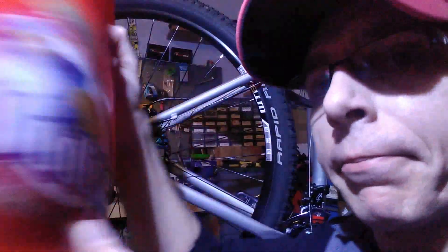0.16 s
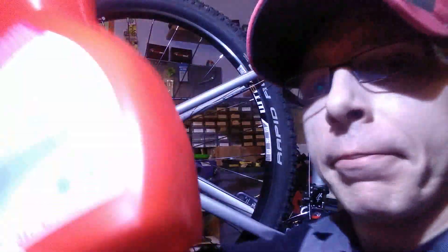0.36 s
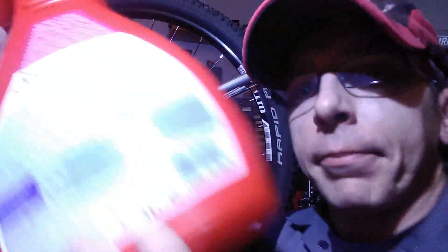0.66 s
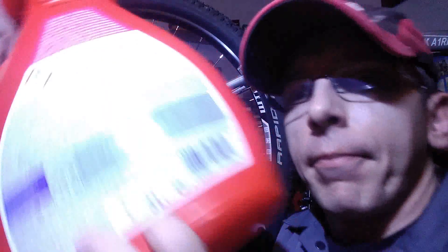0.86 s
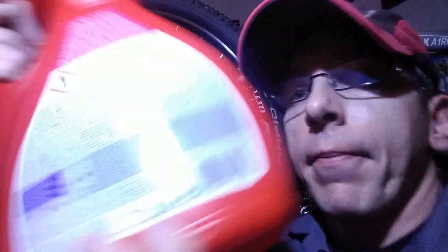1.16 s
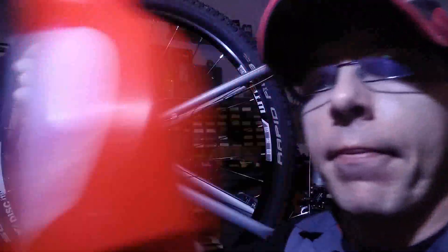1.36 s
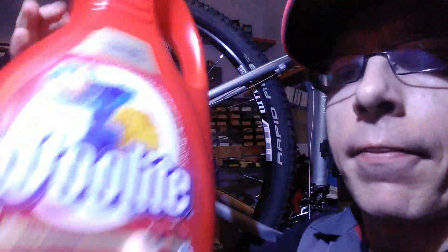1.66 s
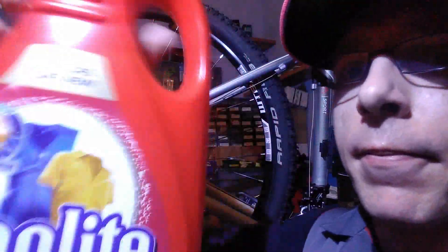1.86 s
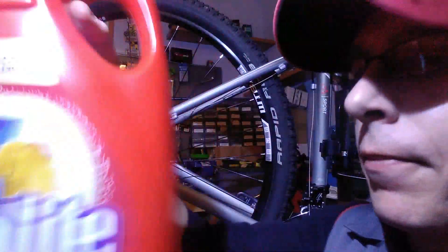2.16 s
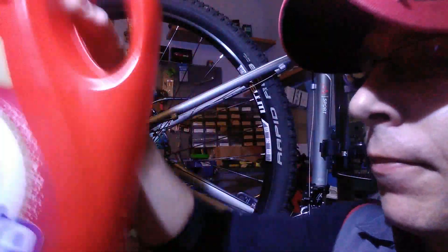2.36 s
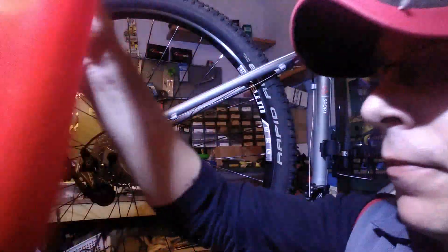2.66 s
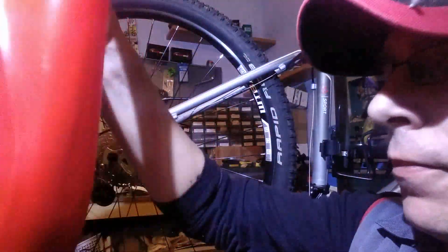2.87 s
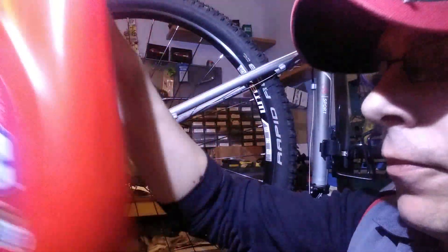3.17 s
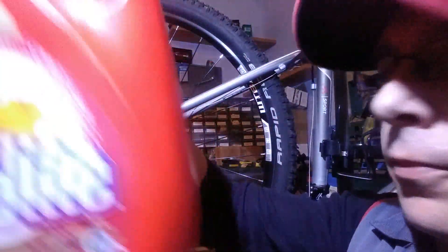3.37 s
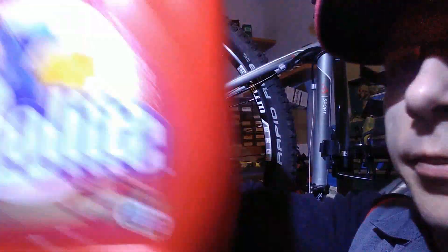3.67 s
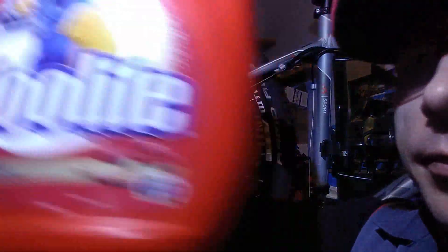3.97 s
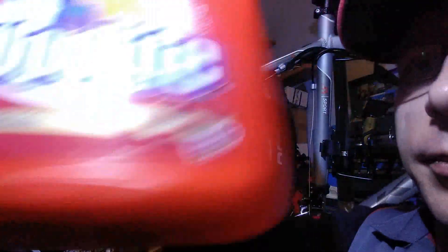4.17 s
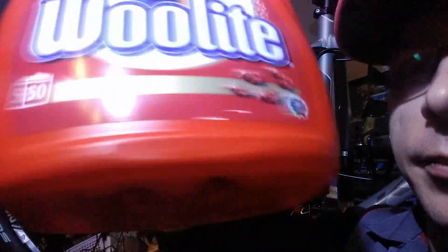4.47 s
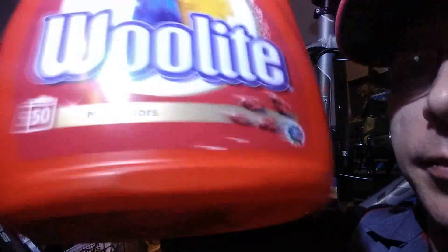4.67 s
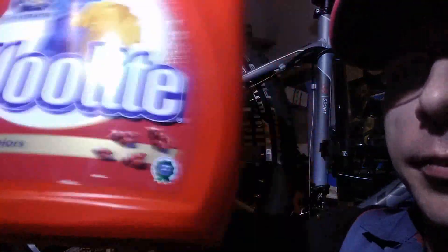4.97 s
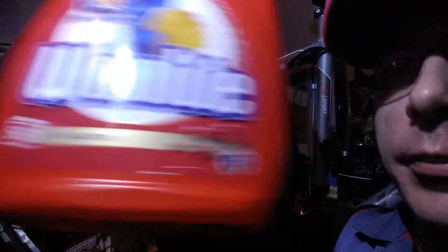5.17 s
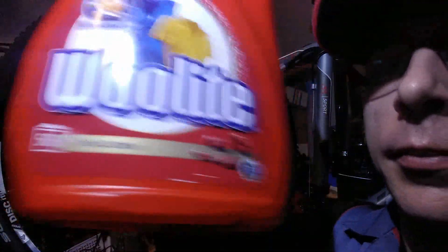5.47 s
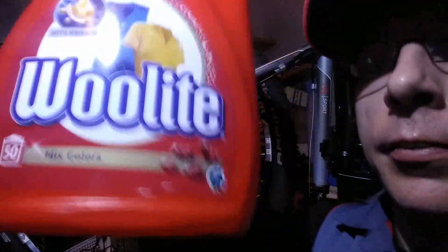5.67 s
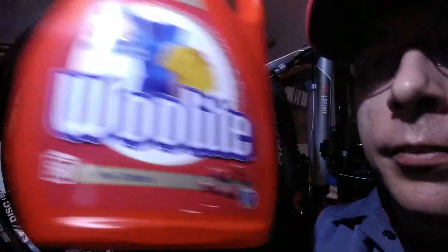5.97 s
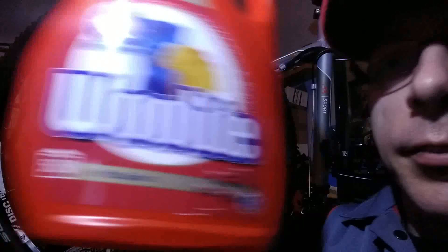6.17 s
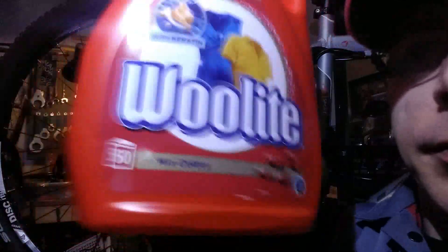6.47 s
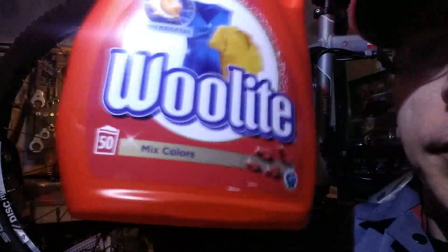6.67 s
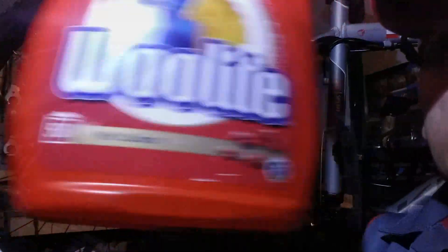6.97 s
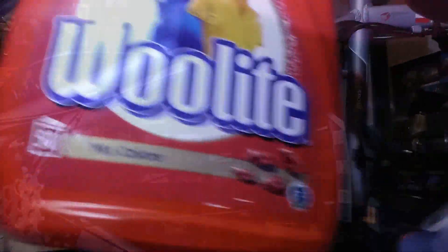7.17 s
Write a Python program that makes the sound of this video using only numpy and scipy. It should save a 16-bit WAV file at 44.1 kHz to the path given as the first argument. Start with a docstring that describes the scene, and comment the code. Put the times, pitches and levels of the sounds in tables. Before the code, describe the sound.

A metal bicycle chain is shaken quickly inside a capped plastic bottle. Each throw lands with a hollow thump and a burst of steel ticks, and the links scrape and rattle in between. The shaking fades almost to silence early on, comes back at its loudest, then eases a little before stopping. It is heard in stereo, close to the microphones, in a small workshop with a short echo.

```python
"""A bicycle chain with a little liquid is shaken fast in a capped plastic bottle, near two microphones.
From the start, each throw lands the chain on the wall as a burst of link impacts: the wall booms and
knocks, the steel ticks, a small workshop answers. Between throws the links keep sliding. The sound fades
almost to silence near 1.9 s, returns at its loudest from 2.2 s, eases a little and ends after 7 s."""
import sys
import numpy as np
from scipy import signal
from scipy.fft import rfft, irfft
from scipy.io import wavfile

SR = 44100
rng = np.random.default_rng(int(sys.argv[2]) if len(sys.argv) > 2 else 0)


def master(y):
    """Save y as 16-bit WAV."""
    cut = np.clip(np.atleast_2d(y).T, -1, 1)
    pcm = np.round(cut * 32767)  # scale
    wavfile.write(sys.argv[1], SR, pcm.astype(np.int16))


N = 323341
BURST_SAMPLES, WALL_BINS = 8192, 1600  # length of one burst, spectrum bins that the wall fills
# Where the bottle is held. Each row: time in seconds, left over right in dB, lead of the left in ms.
PLACE = [(0, .8, .1), (2.8, 2, .17), (4.5, .4, .05), (7.33, -.4, .03)]


def landings():
    """Inelastic collisions: the chain lands spread out in time, a bunched clump almost at once."""
    # Each row: start in seconds, knock in dB, boom over knock in dB, landing time in seconds,
    # pitch of the struck panel in Hz.
    throws = [(0, -27.5, 6, 0.013, 386), (.064, -18.5, 3.5, 0.016, 398), (0.181, -26.5, 0.5, 0.021, 416),
              (.31, -38.5, 5.5, .02, 227), (.362, -31.5, 1, .016, 390), (.444, -29.5, 8.5, .018, 242),
              (.545, -29, 5, 0.022, 286), (.644, -24.5, 0, 0.021, 414), (.69, -27.5, 5.5, 0.024, 414),
              (.764, -27.5, 1.5, 0.026, 381), (0.88, -27, 4.5, .016, 420), (0.965, -25, 3.5, 0.023, 226),
              (1.082, -21.5, 5, 0.022, 220), (1.174, -23.5, -4, 0.017, 236), (1.295, -16, 0, .019, 258),
              (1.383, -20.5, 4.5, .012, 238), (1.447, -17.5, 0.5, .021, 430),
              (1.591, -29.5, 3.5, 0.022, 390), (1.685, -48.5, 18, .024, 210), (1.805, -47, 7.5, 0.021, 418),
              (1.929, -51.5, 9, 0.017, 243), (2.002, -43.5, 6, 0.02, 327), (2.08, -38.5, 4.5, 0.017, 262),
              (2.165, -12, 3, 0.025, 262.5), (2.3, -18, -12, 0.014, 374), (2.396, -24, 3, 0.013, 272),
              (2.456, -29.5, -3, 0.034, 177), (2.482, -15, -4, 0.018, 198), (2.562, -21, -12, 0.015, 168),
              (2.65, -24.5, -12, 0.031, 300), (2.682, -14, 4, 0.012, 283), (2.76, -23.5, -5.5, 0.025, 203),
              (2.906, -11, -8.5, 0.014, 258), (3.039, -23.5, -10, .021, 227), (3.133, -25, 1, 0.017, 166),
              (3.172, -18.5, 3, 0.024, 192), (3.3, -20.5, -16, 0.0086, 300), (3.328, -19, 1, 0.022, 386),
              (3.48, -14, 1.5, .024, 262), (3.597, -19.5, 7.5, 0.02, 261), (3.74, -14, -0.5, 0.021, 292),
              (3.889, -24, 5, 0.029, 242), (4.004, -20, -3, 0.012, 317), (4.145, -26, -19, 0.089, 150),
              (4.167, -24.5, 7, 0.023, 278), (4.31, -25.5, -23, 0.024, 200), (4.376, -26, 5, 0.011, 244),
              (4.453, -33, 8.5, 0.0091, 406), (4.553, -20, 4, 0.018, 273), (4.668, -18, -2, .028, 331),
              (4.869, -20.5, -13, 0.013, 260), (4.982, -18, 4.5, 0.023, 330),
              (5.061, -22.5, -22, 0.013, 307), (5.094, -21, -1.5, .018, 258), (5.2, -20.5, -5, 0.04, 318),
              (5.301, -30, -17, 0.035, 290), (5.397, -22, 4, 0.025, 318), (5.546, -27.5, 1.5, 0.04, 292),
              (5.655, -21.5, 3.5, 0.019, 325), (5.762, -27.5, -13, 0.012, 280),
              (5.856, -27.5, 1, 0.022, 334), (5.895, -25.5, 10, 0.011, 324), (6.003, -30, -0.5, 0.035, 306),
              (6.11, -22.5, 2, .028, 337), (6.224, -31.5, -3, 0.027, 426), (6.318, -22.5, 8, 0.026, 197),
              (6.453, -28, -6, 0.03, 330), (6.554, -27.5, 6, 0.035, 310), (6.585, -17.5, 0, 0.014, 344),
              (6.687, -27, -11, .012, 458), (6.784, -19.5, -0.5, 0.022, 335),
              (6.901, -30.5, -1.5, 0.02, 280), (7.018, -20.5, 0.5, 0.023, 322), (7.179, -41, 3, 0.02, 405),
              (7.232, -32.5, -4, 0.012, 450)]
    # Clumps hit the last throw's panel. Each row: start in seconds, knock in dB, boom over knock in dB.
    clumps = [(1.225, -18.5, 5), (1.329, -15.5, -11), (1.472, -14.5, 0), (2.193, -5, -7), (2.26, -19, -8),
              (2.333, -16, -1), (2.492, -11, -18), (2.694, -8.5, -32), (2.819, -19.5, -1.5),
              (2.925, -13, -0.5), (3.088, -21, 6.5), (3.186, -11.5, 1), (3.523, -24, -1),
              (3.626, -13.5, -8), (3.763, -20, 10.5), (3.913, -21, 15), (3.982, -20.5, -1),
              (4.043, -17.5, 13), (4.234, -14, 3), (4.572, -13.5, 0), (4.714, -24, -10), (4.795, -14, -7.5),
              (4.905, -16.5, 2.5), (4.958, -20, -12), (5.02, -14.5, -1), (5.25, -14, -10), (5.441, -14, 1),
              (5.683, -13, -5.5), (6.141, -25, 1), (6.168, -23, 7), (6.357, -14, -0.5), (6.606, -17.5, 7),
              (7.048, -13, 3.5)]
    throw_tick_db, clump_tick_db, clump_s = -6.5, -10.5, 0.0037  # ticks are relative to the knock
    starts = np.transpose(throws)[0]
    for row in throws:
        yield *row, throw_tick_db
    for s, db, boom_db in clumps:
        panel_hz = throws[np.searchsorted(starts, s) - 1][-1]
        yield s, db, boom_db, clump_s, panel_hz, clump_tick_db


def chain_throws():
    """Impact excitation: links arrive in a swell, then trail in. Gives wall sound and force on steel."""
    soft_db, hard_db = -50, -28  # softer landings ring lower corners and tick less
    wall, steel, t = np.zeros((2, N)), np.zeros((1, N)), np.arange(5000) / SR
    for s, db, boom_db, landing_s, panel_hz, tick_db in landings():
        hardness = np.clip((db - soft_db) / (hard_db - soft_db), 0, 1)
        corner_hz = 558.8 * 3.4 ** (hardness * rng.random() ** 1.8)
        progress = t / landing_s
        trail = 2 * np.exp(-(progress / 1.1) ** 1.1)
        hits = link_impacts(count=len(t), per_s=1500, uneven_db=4.0)
        hits[0] = 4.5  # the leading link strikes hard
        force = (progress + .25) * trail * hits
        bulk = (progress + .2) * trail * hits  # the heavy panels answer to the bulk of the chain
        boom, knock = gain_of(db + boom_db) * bulk, gain_of(db) * force
        add(wall, round(s * SR), wall_burst(s, boom, knock, panel_hz, corner_hz))
        add(steel, round(s * SR), gain_of(db + tick_db - 3 * (1 - hardness)) * force[None])
    return wall, steel[0]


def link_impacts(count, per_s, uneven_db):
    """Shot noise: independent link impacts, a few much harder than the rest, scaled to unit power."""
    chance, hardness, sign = rng.random((count, 3)).T
    size = gain_of(uneven_db * np.minimum(-np.log(hardness + 1e-9), 4)) * (chance < per_s / SR)
    return size * np.sign(sign - .3) / np.sqrt(np.mean(size ** 2) + 1e-12)


def wall_burst(s, boom, knock, panel_hz, corner_hz):
    """Forced vibration: wide panels boom, stiff corners knock, each by its own path to the microphones."""
    # The wall's modes. Each row: frequency in Hz, level in dB, time to fall 60 dB in seconds.
    modes = [(123, 4, 0.043), (186, -1.5, 0.11), (230.5, -5, 0.1), (300, -3, 0.079), (335.4, -3, 0.07),
             (433, 3, 0.038), (543, 5, 0.012), (713, 6.5, 0.028), (784.6, -8.5, 0.094), (855, 2, 0.026),
             (1085, 9, 0.0097), (1289, 8, 0.0067), (1583, 2, 0.021), (1824, 5, 0.018), (2070, -11.5, 0.013)]
    # The deepest mode as the bottle is turned. Each row: time in seconds, added level in dB.
    deepest = [(0, -3), (2.2, -2), (3.6, 2), (4.4, 4.5), (5.2, -3.5), (7.33, -5.5)]
    panels = [np.add(modes[0], (0, *curve(deepest, s), 0)), *modes[1:6]]
    corners = modes[6:]
    pan_db, lead_ms = curve(PLACE, s)
    lean, hz = gain_of(pan_db / 2), np.arange(WALL_BINS) * SR / BURST_SAMPLES
    half = rng.random(len(knock)) < .5  # the impacts fall on two neighbouring spots
    low = ring(boom, panels, panel_hz, favour_db=8.0, detune=0.072, uneven_db=4.0)
    pair = 0
    for spot, (offset, side) in zip((half, ~half), rng.uniform(-1.09, 1, (2, 2))):
        high = ring(knock * spot, corners, corner_hz, favour_db=4, detune=0.136, uneven_db=2.5)
        delay = np.exp(-2j * np.pi * hz * (lead_ms + 0.19 * offset) / 1000)
        aside = gain_of(3.27 * side)
        left = (low / 2 + high * aside) * lean
        right = (low / 2 + high / aside) * delay / lean
        pair = pair + np.array([left, right])
    return irfft(pair, BURST_SAMPLES)


def ring(force, modes, struck_hz, favour_db, detune, uneven_db):
    """Modal superposition, as a spectrum: the mode nearest the struck pitch moves onto it, boosted."""
    hz, db, t60 = np.transpose(modes)
    shift, excess, sign = rng.standard_normal((len(modes), 3)).T
    nearest = np.arange(len(modes)) == np.argmin(abs(np.log(hz / struck_hz)))
    hz = np.where(nearest, struck_hz, hz * (1 + detune * shift))
    height = gain_of(db + np.where(nearest, favour_db, uneven_db * excess))
    height *= np.sign(sign + 0.43)  # some start inward, some outward
    jw = 2j * np.pi * np.arange(WALL_BINS)[:, None] * SR / BURST_SAMPLES
    omega, damping = 2 * np.pi * hz, np.log(1000) / t60
    response = (height * omega / ((jw + damping) ** 2 + omega ** 2)).sum(1)  # decaying sines
    response /= np.sqrt(2 * np.sum(abs(response) ** 2) / BURST_SAMPLES)
    return rfft(force, BURST_SAMPLES)[:WALL_BINS] * response


def sliding_links():
    """Sliding contact: small impacts ring one spot after another. Gives wall sound and force on steel."""
    # Each row: time in seconds, knock level in dB.
    levels = [(0, -35), (.28, -45), (.77, -35.5), (1.08, -36), (1.53, -34.5), (1.79, -53.5), (1.94, -80),
              (2.15, -53), (2.25, -28.5), (3.25, -29), (3.41, -35.5), (3.67, -26.5), (4.31, -40),
              (4.76, -25), (5.41, -44), (5.73, -29.5), (6.25, -49), (6.55, -34.5), (7.1, -36), (7.33, -63)]
    span = 5000  # samples on one spot
    wall, steel, fade = np.zeros((2, N)), np.zeros((1, N)), np.sin(np.pi * np.arange(span) / span)
    for at in range(0, N, span // 2):
        db, = curve(levels, (at + np.arange(span)) / SR)
        knock = gain_of(db) * fade * link_impacts(count=span, per_s=1100, uneven_db=4.5)
        panel_hz, corner_hz = 170 * 2.3 ** rng.random(), 600 * 3.3 ** rng.random()
        add(wall, at, wall_burst(at / SR, gain_of(1.5) * knock, knock, panel_hz, corner_hz))
        add(steel, at, gain_of(-4.5) * knock[None])
    return wall, steel[0]


def corner_raps():
    """Impulse response: one link raps a stiff corner, mostly while a throw lands, with a little boom."""
    # Each row: start in seconds, knock in dB, pitch of the corner in Hz.
    raps = [(0.382, -0.5, 800), (1.105, 6, 644), (3.21, 1, 710), (4.34, 0, 1510), (4.388, 2, 795),
            (4.848, 2, 1810), (5.066, 4, 1880), (5.082, 0, 800), (5.34, 1, 1100), (5.71, 6, 810),
            (6.029, -2, 1720), (6.459, -0.5, 736)]
    wall = np.zeros((2, N))
    for s, db, corner_hz in raps:
        boom, knock = gain_of([db - 9.0]), gain_of([db])
        add(wall, round(s * SR), wall_burst(s, boom, knock, panel_hz=344, corner_hz=corner_hz))
    return wall


def link_cracks():
    """Hard contact: one link cracking on another is a single impulse of force on the steel."""
    # Each row: time in seconds, force in dB.
    cracks = [(.071, -27), (0.561, -2), (0.6633, -3.5), (0.789, 1.5), (0.9748, 5.5), (1.0974, -12),
              (1.1978, 3), (1.291, 0), (1.4463, -20), (2.168, 2), (2.492, 3), (2.6539, -7), (2.689, 9.5),
              (2.9066, 0), (3.243, 1), (3.3035, -23), (3.7621, 9), (4.0435, 3.5), (4.7605, -3),
              (4.872, 4.5), (5.546, -3.5), (6.115, -6), (6.7925, -15)]
    s, db = np.transpose(cracks)
    steel = np.zeros(N)
    steel[np.round(s * SR).astype(int)] = gain_of(db)
    return steel


def steel_ticks(force, t60, snap, coherence):
    """High modal density: each impact of steel on steel is a snap and a puff of decaying noise."""
    # The ticks heard through the wall. Each row: frequency in Hz, relative spectral density in dB.
    spectrum = [(1300, -6.5), (2200, -3), (4500, -9), (11200, -21.5), (13700, -24.5), (14600, -43)]
    # The right microphone is brighter. Each row: frequency in Hz, right over left in dB.
    right_air = [(5000, -0.5), (8000, 2.5), (14000, 5)]
    pan_db, lead_ms = curve(PLACE, np.arange(N) / SR)
    fall = gain_of(-60 / (t60 * SR)) ** 2
    energy = signal.lfilter([1 - fall], [1, -fall], force ** 2)
    left_puff, right_puff = rng.standard_normal((2, N)) * np.sqrt(energy)
    left = left_puff + snap * force
    lag = np.round(lead_ms * SR / 1000).astype(int)
    delayed = left[np.maximum(np.arange(N) - lag, 0)]
    right = coherence * delayed + np.sqrt(1 - coherence ** 2) * right_puff
    pair = np.array([left, right]) * gain_of([pan_db / 2, -pan_db / 2])
    hz = np.fft.rfftfreq(512, 1 / SR)
    colour, air = gain_of(at_hz(spectrum, hz)), gain_of(at_hz(right_air, hz) / 2)
    colour /= np.sqrt(np.mean(colour ** 2))
    taps = np.roll(irfft(colour * [1 / air, air]), 256, axis=1)
    return signal.oaconvolve(pair, taps, "same", axes=1)


def workshop(near):
    """Reverberation: sparse reflections die away band by band; the moving bottle keeps changing them."""
    # Each row: frequency in Hz, reverberation time in seconds.
    decay_times = [(120, 0.36), (1000, 0.25), (9000, 0.22)]
    # Bass comes mostly direct. Each row: frequency in Hz, level of the reflections in dB.
    levels = [(100, -13.5), (500, -23), (2000, -7.5), (10000, -1)]
    taps = np.zeros((3, 2, SR // 3))  # three patterns of reflections, two microphones
    at = np.arange(120, SR // 3 - 20, 20) + rng.integers(0, 20, (3, 2, (SR // 3 - 121) // 20))
    np.put_along_axis(taps, at, rng.choice([-1., 1.], at.shape), 2)
    hz, t, bands = signal.stft(taps, SR, nperseg=256)
    decay = gain_of(-60 * t / at_hz(decay_times, hz)[:, None]) * (t > .002)
    decay /= np.sqrt((decay ** 2).sum(1, keepdims=True) * 128 / 20)  # energy 1 in every band
    tails = signal.istft(bands * decay * gain_of(at_hz(levels, hz))[:, None], SR, nperseg=256)[1]
    blend = np.sqrt(2 / 3) * np.cos(np.pi * (4.3 * np.arange(N) / SR + np.arange(3)[:, None] / 3))
    return signal.oaconvolve((near.mean(0) * blend)[:, None], tails, axes=2).sum(0)[:, :N]


def gain_of(db):
    """Amplitude ratio of a level in decibels."""
    return 10 ** (np.asarray(db) / 20)


def at_hz(points, hz):
    """Interpolation on a logarithmic frequency axis."""
    known_hz, value = np.transpose(points)
    return np.interp(np.log(hz + 1), np.log(known_hz + 1), value)


def curve(rows, t):
    """Linear interpolation of each column over time."""
    s, *columns = np.transpose(rows)
    return [np.interp(t, s, column) for column in columns]


def add(mix, at, sound):
    """Superposition of a sound onto the mix from a given sample on."""
    part = mix[:, at:at + sound.shape[1]]
    part += sound[:, :part.shape[1]]


def scene():
    """Direct and reverberant fields add: the wall and the steel close by, then the workshop."""
    thrown, struck = chain_throws()
    slid, rubbed = sliding_links()
    near = thrown + slid + corner_raps()
    near += steel_ticks(struck + rubbed + link_cracks(), t60=0.024, snap=0.68, coherence=0.043)
    return near + workshop(near)


def record(dry):
    """Band limiting and saturation: small microphones lose deep bass, the input rounds off peaks."""
    thin = signal.sosfilt(signal.butter(3, 140, "high", fs=SR, output="sos"), dry)
    rounded = thin / (1 + abs(thin) ** 5) ** (1 / 5)
    lowpass = signal.firwin(255, 14700, window=("kaiser", 8), fs=SR)
    return signal.oaconvolve(rounded, lowpass[None], "same")


dry = scene()
out = record(dry)
master(out)
```